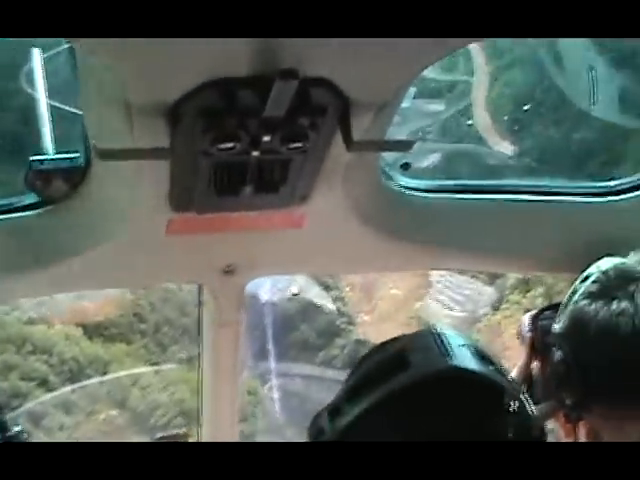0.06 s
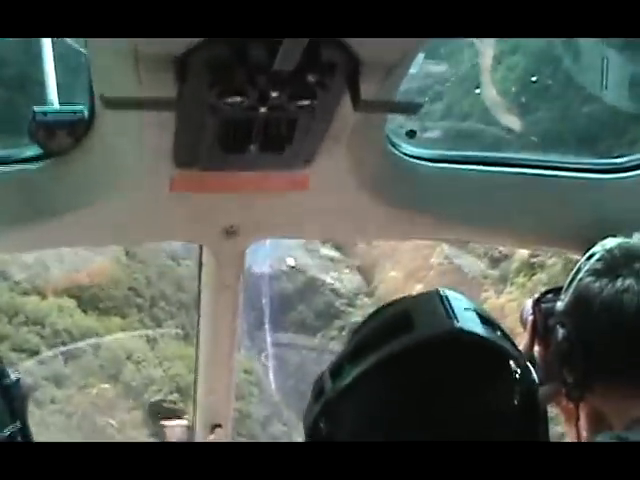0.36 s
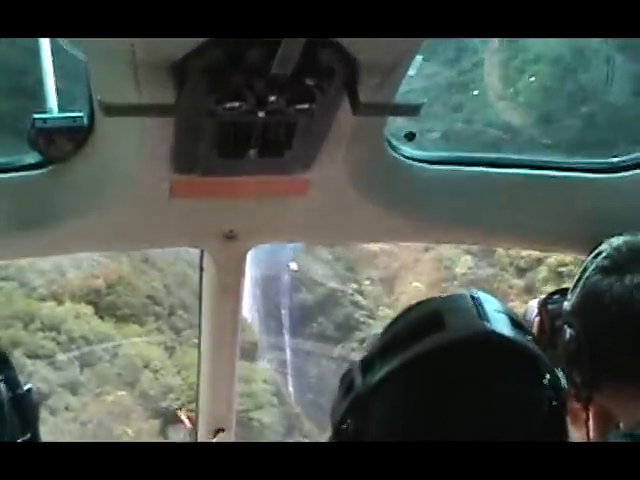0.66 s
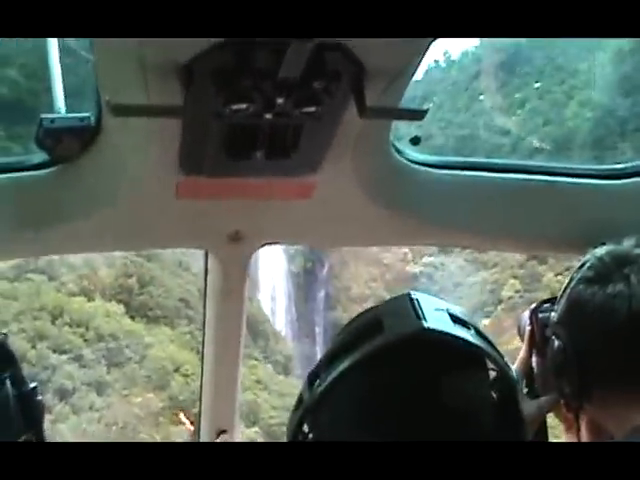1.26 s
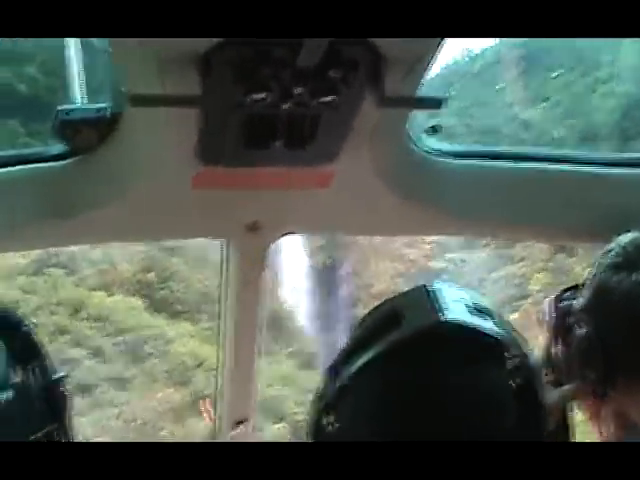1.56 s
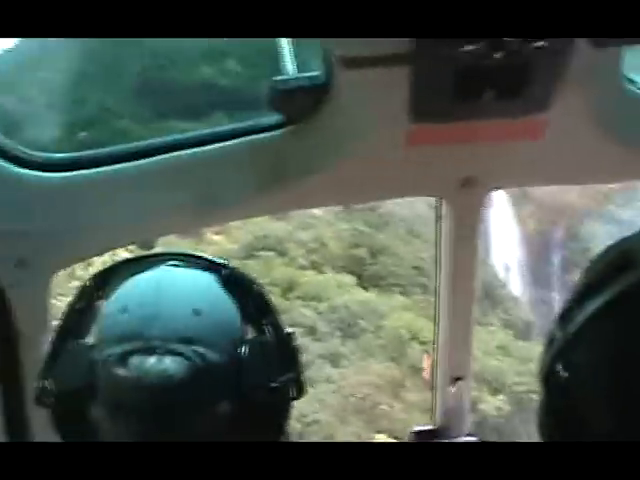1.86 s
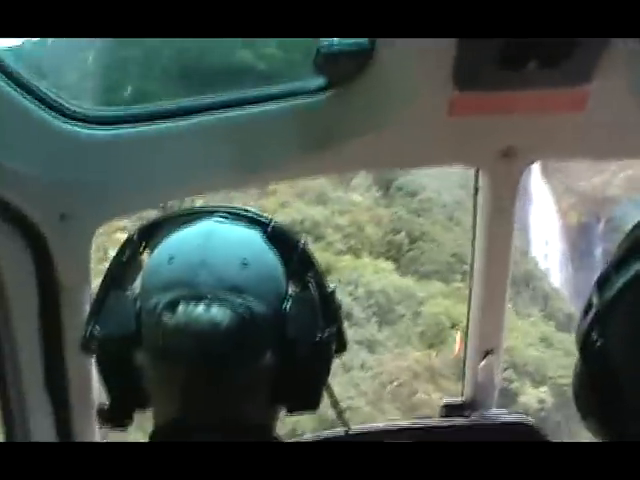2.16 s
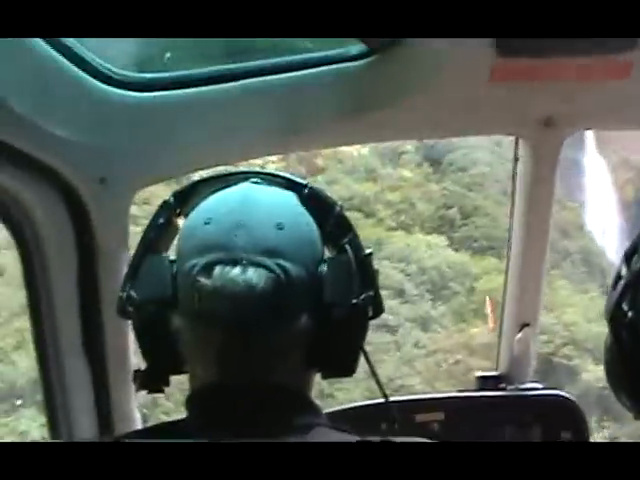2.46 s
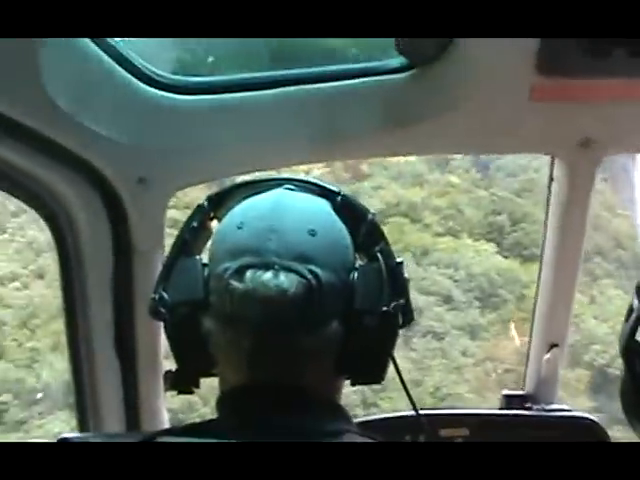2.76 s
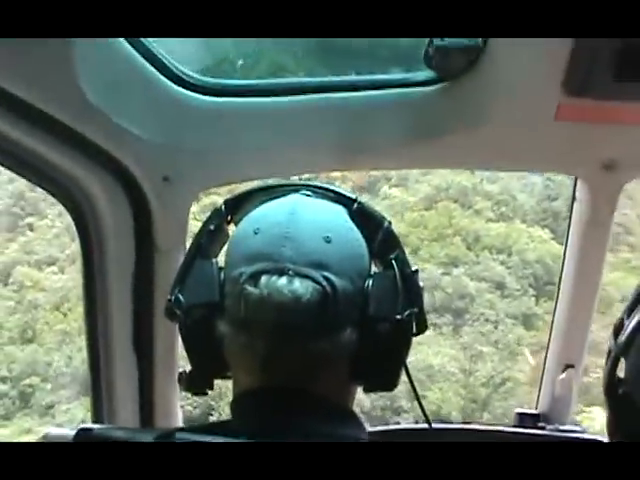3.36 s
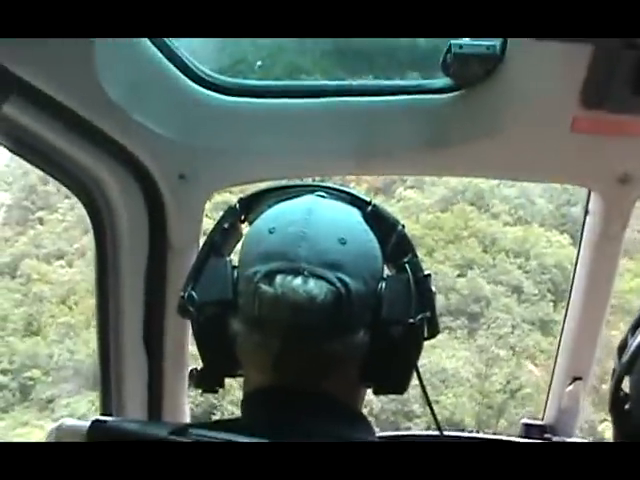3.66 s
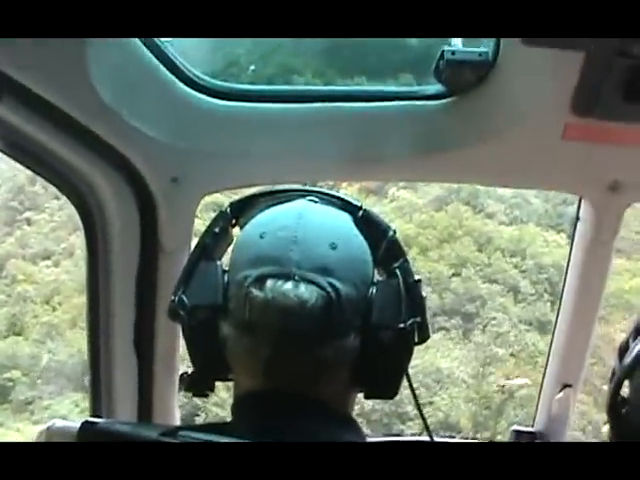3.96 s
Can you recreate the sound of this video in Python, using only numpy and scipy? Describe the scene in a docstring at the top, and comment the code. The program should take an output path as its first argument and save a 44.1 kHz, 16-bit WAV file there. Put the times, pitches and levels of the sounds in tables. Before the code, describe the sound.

Helicopter noise fills the cabin around the microphone without a break: a loud, ringing gearbox whine, a rapid low rotor throb and roaring air. A faint high turbine whistle wavers throughout, and air hisses in small puffs.

```python
"""Inside a landing helicopter

The three-blade main rotor throbs through the cabin and pumps a roar of air and exhaust.
The gearbox sings three loud tones with overtones, the tail rotor hums, the turbine whistles high
above, and air hisses past the doors in puffs. The tones form standing waves (loud and quiet spots),
so their level in each ear shifts as the listener turns left halfway."""
import sys
import numpy as np
from scipy import signal
from scipy.fft import rfft, irfft
from scipy.io import wavfile
from scipy.ndimage import uniform_filter1d, minimum_filter1d

SR = 44100
rng = np.random.default_rng(int(sys.argv[2]) if len(sys.argv) > 2 else 0)


def digitize_waveform(pressure):
    """Quantize a signal to 16-bit integers and store it at the path in sys.argv[1].

    Rows of a 2-D input are taken as channels; values are limited to [-1, 1].
    """
    field = np.atleast_2d(pressure).T
    bounded = np.clip(field, -1, 1)
    quanta = np.round(bounded * 32767).astype(np.int16)
    wavfile.write(sys.argv[1], SR, quanta)


N = 176400
TIME = np.arange(N) / SR
FREQS = np.maximum(np.fft.rfftfreq(N, 1 / SR), 1)
SIDES = np.array([[1], [-1]])  # left, right
BLADES, TEETH_PER_TURN = 3, 100  # of the main rotor and its gear


def from_db(db):
    """Turn decibels into a gain."""
    return 10 ** (np.asarray(db) / 20)


def over_time(rows):
    """Draw lines between a table's rows: one curve in time per column."""
    times, *columns = np.transpose(rows)
    return np.array([np.interp(TIME, times, column) for column in columns])


def over_freq(rows):
    """Draw lines between a table's rows: one value per frequency."""
    hz, value = np.transpose(rows)
    return np.interp(np.log(FREQS), np.log(hz), value)


def pan(db):
    """Left and right gains; positive dB leans left."""
    gains = from_db(SIDES * db / 2)
    return gains / np.sqrt(np.mean(gains ** 2, axis=0))


def phase_of(hz):
    """The running angle of a changing frequency."""
    return 2 * np.pi * np.cumsum(hz) / SR


def flutter(width_hz):
    """A random wobble, faster when wider; its complex values shake both level and phase."""
    spectrum = rng.standard_normal((2, len(FREQS))) + 1j * rng.standard_normal((2, len(FREQS)))
    real, imag = irfft(spectrum / (1 + (FREQS / width_hz) ** 2), N)
    return (real + 1j * imag) / np.sqrt(np.mean(real ** 2 + imag ** 2))


def stereo_flutter(width_hz, apart):
    """A wobble that the ears partly share (fully when apart is 0)."""
    return (flutter(width_hz) + apart * flutter(width_hz) * SIDES) / np.hypot(1, apart)


def tone(phase, rough, width_hz, apart=0.68, lead=0):
    """A stereo tone, pure when rough is 0; the left ear is ahead by lead radians."""
    wobble = (1 + rough * stereo_flutter(width_hz, apart)) / np.hypot(1, rough)
    ear_phase = phase + rng.uniform(0, 2 * np.pi) + SIDES * lead / 2
    return np.sqrt(2) * np.real(wobble * np.exp(1j * ear_phase))


def lows(sound, hz):
    """The part of a sound below a frequency."""
    return irfft(rfft(sound) / (1 + (FREQS / hz) ** 6), N)


# How alike the air sounds in both ears: f/Hz, likeness (1 = the same)
EAR_LIKENESS = [(50, 0.5), (130, 1), (260, 0.8), (600, 0.64), (1200, 0.8), (3000, 0.7), (9000, 0.68)]
# Which side the air is louder on: f/Hz, left minus right/dB
EAR_BALANCE = [(40, 9), (90, -9.5), (150, -4), (260, -1.5), (600, 0), (1000, 1.5), (2000, 0.8),
               (5000, -1.5), (10000, 0)]

def air_noise(spectrum):
    """Rushing air: noise shaped by a spectrum, partly shared by the ears."""
    shared, side = rfft(rng.standard_normal((2, N)))
    alike = np.clip(over_freq(EAR_LIKENESS), 0, 1)
    ears = np.sqrt(1 + alike) * shared + np.sqrt(1 - alike) * side * SIDES
    shaped = ears * from_db(over_freq(spectrum)) * pan(over_freq(EAR_BALANCE))
    return irfft(shaped, N) * np.sqrt(SR) / 2


# The hiss's basic tone colour: f/Hz, level/dB
HISS_SPECTRUM = [(400, -75), (1500, -64), (3200, -70), (4500, -70.5), (6500, -75), (8400, -73.5),
                 (9600, -78), (11000, -81.5)]
# How the hiss swells: t/s, gain/dB, pumping by the blades/dB
HISS_SWELLS = [(0, -0.5, 2), (.25, 1, 2), (.55, -3, 2.5), (.8, -3, -2), (.92, 0, -1), (1.25, -2, -1),
               (1.55, 0, 0.5), (1.95, -.5, 2.5), (2.1, -5, 7), (2.3, -3, 4), (2.6, -1, 1.5), (2.78, 2, 1.5),
               (3, -2, -0.5), (3.35, 0.5, 1), (3.7, -2, -1.5), (4, -2, 2.5)]
# Short puffs of air: t/s, gain/dB
DOOR_PUFFS = [(.868, 6), (1.473, 5), (1.64, 3), (2.051, 0), (2.1, -3), (2.157, 5), (2.207, 4), (2.359, 6.5),
              (2.566, 9), (2.877, 2), (3.468, 2), (3.521, 5.5), (3.624, 1), (3.676, 6.5), (3.727, 5)]

def door_hiss(blade_phase):
    """Air rushing past the doors pumps with the blades; now and then a harder puff hits."""
    level_db, pump_db = over_time(HISS_SWELLS)
    puffs = 0
    for at, db in DOOR_PUFFS:
        width_s = np.where(TIME < at, 0.0043, 0.0072)  # quick rise, slower fall
        puffs += from_db(db) * np.exp(-.5 * ((TIME - at) / width_s) ** 2)
    flow = from_db(level_db + pump_db * np.cos(blade_phase) + 3 * flutter(width_hz=87).real)
    return np.hypot(flow, puffs) * air_noise(HISS_SPECTRUM)


# Two whistles: t/s, lower f/Hz, upper f/Hz, lower level/dB, upper level/dB
WHISTLES = [(0, 8720, 10330, -40, -46), (.15, 8720, 10260, -36.5, -42), (.52, 8730, 10300, -33.5, -39.5),
            (.75, 8800, 10350, -38.5, -42), (1.15, 8840, 10470, -40.5, -47), (1.6, 8790, 10390, -39, -43),
            (2, 8790, 10300, -44, -46), (2.35, 8760, 10370, -42, -37.5), (2.6, 8750, 10340, -41, -42),
            (2.75, 8760, 10320, -47, -41), (3.55, 8840, 10450, -44, -43.5), (4, 8820, 10580, -49, -48)]

def turbine():
    """The compressor whistles twice over: two wavering tones, each in a wider band of noise."""
    low_hz, high_hz, low_db, high_db = over_time(WHISTLES)
    out = 0
    for hz, db in ((low_hz, low_db), (high_hz, high_db)):
        waver_hz = 30.8 * flutter(width_hz=19.2).real
        core = tone(phase_of(hz + waver_hz), rough=3.4, width_hz=61, apart=0.23)
        band = np.real(stereo_flutter(width_hz=160, apart=0.5) * np.exp(1j * phase_of(hz)))
        flicker_db = 2 * flutter(width_hz=50).real
        out += from_db(db + flicker_db) * (core + from_db(4.5) * band) / np.sqrt(2)
    return out


# The roar's basic tone colour: f/Hz, level/dB
ROAR_SPECTRUM = [(18, -61), (42, -46), (65, -45.5), (92, -40.5), (135, -41), (165, -45.5), (195, -45),
                 (230, -40.5), (265, -45.5), (345, -45), (490, -50.5), (660, -47), (760, -51.5),
                 (1000, -55), (1250, -55.5), (1450, -62.5), (1700, -56.5), (2000, -63.5), (2800, -68.5),
                 (3300, -65.5), (4000, -78), (10000, -75.5)]
# How the cabin sound swells: t/s, bass and shaft/dB, low middle/dB, all above/dB, blade thump/dB
CABIN_SWELLS = [(0, -1.5, 0.5, 1.5, 3.5), (.5, -0.5, 1.5, 0.5, -6), (1.1, .5, -0.5, 1, 1.5),
                (1.6, 1, -0.5, 0.5, -0.5), (2.1, 1.5, 0, -1.5, -3), (2.7, 0, -2.5, -1, 0),
                (3.2, 0.5, 0.5, -1.5, .5), (3.7, -3, 4, -1, -1.5), (4, 0.5, 4, -0.5, -0.5)]

def cabin_roar(blade_phase):
    """Air and exhaust roar through the cabin, swelling a little with every blade."""
    bass_db, middle_db, upper_db, _ = over_time(CABIN_SWELLS)
    noise = air_noise(ROAR_SPECTRUM)
    bass, lower = lows(noise, hz=255), lows(noise, hz=425)
    middle, upper = lower - bass, noise - lower
    roar = from_db(bass_db) * bass + from_db(middle_db) * middle + from_db(upper_db) * upper
    return from_db(0.48 * np.cos(blade_phase - .6)) * roar


# The tail rotor's fading hum: t/s, level/dB
TAIL_HUM = [(0, -27), (.6, -25.5), (1.4, -28), (2.7, -29), (3.2, -36), (4, -43)]
TAIL_RATIO, SHAFT_HZ = .1063, 99.8

def tail_rotor(tooth_phase):
    """The spinning tail rotor and its drive shaft each hum a low note."""
    hum = tone(BLADES * TAIL_RATIO * tooth_phase, rough=0.31, width_hz=3.3)
    shaft = tone(2 * np.pi * SHAFT_HZ * TIME, rough=0.21, width_hz=1.8, apart=0.24)
    shaft_db = over_time(CABIN_SWELLS)[0] - 24.5
    return from_db(over_time(TAIL_HUM)) * hum + from_db(shaft_db) * shaft


# The thump's tones at 1, 2, 3... times the blade rate: level/dB before swells
THUMP_HARMONICS = [-44, -26, -25.5, -26.5, -31, -43, -31]

def main_rotor(blade_phase):
    """Each passing blade sends a thump of pressure through the cabin, no two quite alike."""
    thump = 0
    for multiple, db in enumerate(THUMP_HARMONICS, 1):
        uneven = .08 * multiple
        wobble = (1 + uneven * flutter(width_hz=2.2)) / np.hypot(1, uneven)
        thump += from_db(db) * np.real(wobble * np.exp(1j * multiple * blade_phase))
    swell_db = over_time(CABIN_SWELLS)[3]
    return np.sqrt(2) * from_db(swell_db) * thump


# The three loud gear tones, each: t/s, left level/dB, right level/dB
MAIN_TONE = [(0, -33, -24.4), (0.45, -25.5, -18.5), (0.9, -22, -19.5), (1.2, -25, -21), (2.5, -26, -21),
             (2.95, -22.5, -19), (3.35, -25.5, -23), (3.8, -21, -19), (4, -25, -21.5)]
OCTAVE_TONE = [(0, -26.5, -20), (0.25, -30, -19.5), (0.85, -23.5, -20), (1.05, -25.5, -20),
               (1.8, -22.5, -21.5), (2.05, -23.5, -23.5), (2.5, -21, -23), (2.9, -22, -25),
               (3.35, -23, -26), (4, -21, -24)]
INPUT_TONE = [(0, -28, -23), (0.35, -25, -26.5), (1, -33, -24.5), (1.55, -29, -25.5), (1.8, -45, -27.5),
              (2.02, -40, -28), (2.3, -26, -22), (2.6, -23, -21.5), (3, -22, -20), (3.35, -24, -21),
              (3.75, -21.5, -20), (4, -22.5, -23)]
# Weaker gear tones: multiples of the main tooth rate, then level/dB of each
WEAK_MULTIPLES = [1.079, 1.356, 2.539, 2.606, 2.685, 5.285]
WEAK_LEVELS = [-34.5, -41, -44, -42, -37, -45]
# The main gear's high overtones: multiples of its tooth rate
HIGH_MULTIPLES = [3, 4, 5, 6, 7, 8]
# They come and go with the listener's place: t/s, then level/dB of each
HIGH_LEVELS = [(0, -44, -40, -38, -45, -45, -44), (.35, -44, -43, -39.5, -45, -50, -43),
               (.7, -45, -48, -41.5, -46, -54, -55), (1.25, -40, -42, -43, -42, -52, -50),
               (1.7, -37, -41, -42, -46, -48, -47), (2.1, -36.5, -45, -60, -56, -56, -50),
               (2.7, -37.5, -40.5, -49, -45, -58, -56), (3.1, -43, -44, -47, -53, -50, -50),
               (3.55, -42, -44, -46, -47, -50, -52), (3.8, -43, -45, -40, -39.5, -45, -50)]
INPUT_RATIO = 2.6425  # input gear's tooth rate over the main gear's

def gearbox(tooth_phase, blade_phase):
    """Gear teeth sing as they meet; their load rocks once per rotor turn and throbs with each blade."""
    rocked = tooth_phase + 0.069 * np.sin(tooth_phase / TEETH_PER_TURN)
    main = tone(rocked, rough=0.58, width_hz=21, apart=0.23, lead=0.089)
    octave = tone(2 * rocked, rough=0.27, width_hz=53, lead=-0.3)
    input_gear = tone(INPUT_RATIO * tooth_phase, rough=0.13, width_hz=9.4, lead=-0.49)
    out = from_db(over_time(MAIN_TONE)) * main
    out += from_db(over_time(OCTAVE_TONE)) * octave
    out += from_db(over_time(INPUT_TONE)) * input_gear
    for multiple, db in zip(WEAK_MULTIPLES, WEAK_LEVELS):
        out += from_db(db) * tone(multiple * rocked, rough=0.62, width_hz=7.1, apart=0.2)
    for multiple, db in zip(HIGH_MULTIPLES, over_time(HIGH_LEVELS)):
        out += from_db(db) * tone(multiple * rocked, rough=0.71, width_hz=32, apart=0.44)
    return out * from_db(.5 * np.cos(blade_phase))


# Drive speed, as how often the main gear's teeth meet: t/s, f/Hz
TOOTH_RATE = [(0, 641.4), (0.15, 642.8), (0.5, 640.6), (0.85, 641.3), (1.2, 642.2), (1.7, 642.8),
              (2.25, 642.9), (2.8, 641.9), (3.1, 640.9), (3.5, 640.4), (3.8, 638.9), (4, 638.4)]
FIRST_THUMP_S = 0.02073

def scene():
    """One drive turns the gears and rotors, so everything throbs in step."""
    tooth_hz, = over_time(TOOTH_RATE)
    tooth_phase = phase_of(tooth_hz)
    blade_phase = (tooth_phase - 2 * np.pi * tooth_hz[0] * FIRST_THUMP_S) * BLADES / TEETH_PER_TURN
    rotors = (main_rotor(blade_phase) + tail_rotor(tooth_phase)) * pan(db=-5.5)
    machinery = rotors + gearbox(tooth_phase, blade_phase) + turbine()
    return machinery + cabin_roar(blade_phase) + door_hiss(blade_phase)


LIMIT_DB, HOLD_S, CUTOFF_HZ = -1, .006, 10950

def record(dry):
    """A fast limiter turns down the loudest peaks; a steep filter cuts the highest treble."""
    hold = int(HOLD_S * SR)
    gain = np.minimum(1, from_db(LIMIT_DB) / (np.abs(dry).max(axis=0) + 1e-9))
    smooth_gain = uniform_filter1d(minimum_filter1d(gain, hold), hold)
    treble_cut = signal.ellip(14, .1, 90, CUTOFF_HZ, fs=SR, output="sos")
    return signal.sosfilt(treble_cut, dry * smooth_gain)


dry = scene()
out = record(dry)
digitize_waveform(out)
```